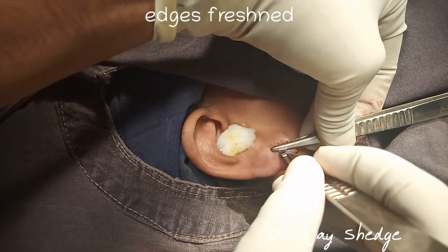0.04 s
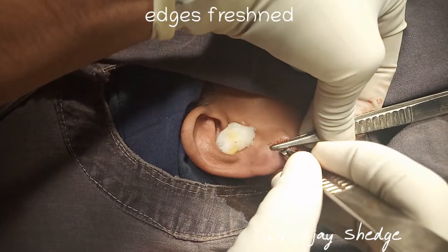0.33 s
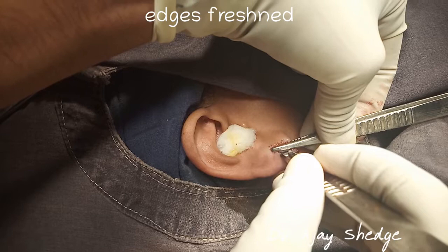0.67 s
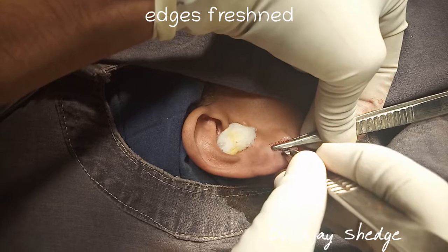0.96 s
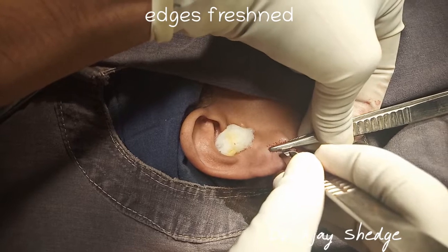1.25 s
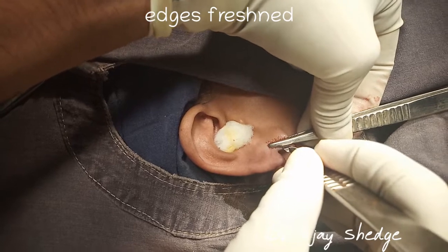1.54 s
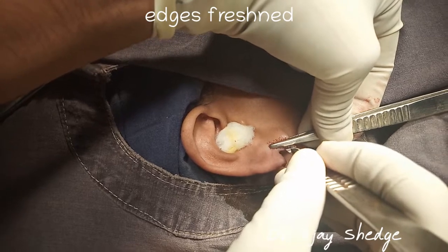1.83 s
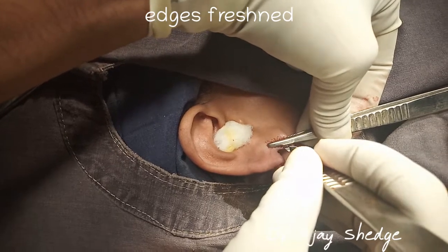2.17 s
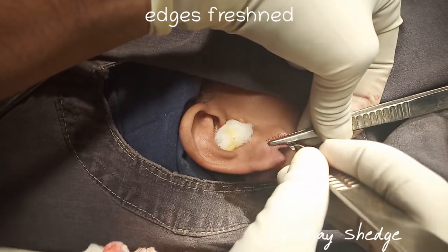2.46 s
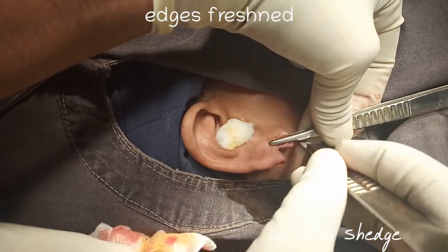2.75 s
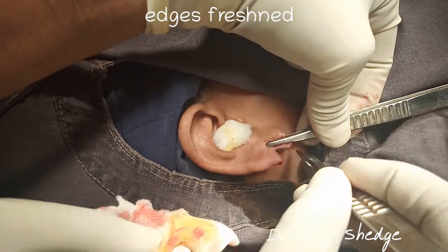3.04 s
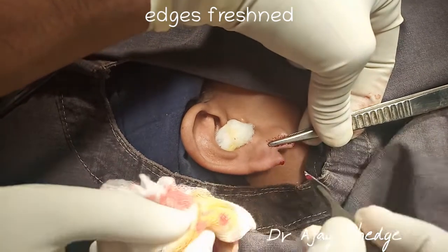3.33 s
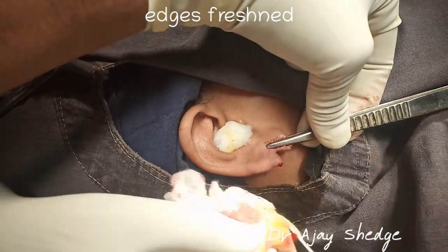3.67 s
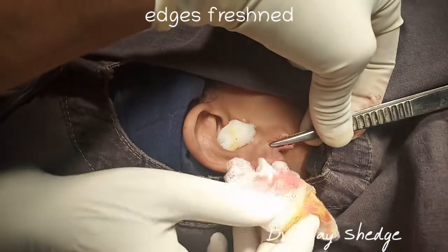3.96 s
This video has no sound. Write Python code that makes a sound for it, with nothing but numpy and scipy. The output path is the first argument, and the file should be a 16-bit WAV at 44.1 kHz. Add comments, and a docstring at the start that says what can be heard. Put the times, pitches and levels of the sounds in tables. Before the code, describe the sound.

Steel surgical instruments snip and clink close by in a small, quiet room, where a low machine hum throbs throughout over air noise and a faint whirr. Sliding steel squeaks faintly at first. From about 2.1 to 3 seconds come dry snips, taps, bright clinks and tiny squeaks, with glove and gauze rustle. A softer rustle lingers, and near 3.9 seconds another instrument clinks amid light taps.

```python
"""Steel instruments are worked close by in a small, quiet treatment room. From the start a machine, probably a
compressor, hums and throbs over air noise and a faint whirr; the ring of an earlier clink fades out and sliding
steel squeaks faintly. From 2.1 to 3 s come dry snips and taps, steel clinks and squeaks, and glove and gauze
rustle. A softer rustle lingers; near 3.9 s a second, loosely held instrument clinks amid a few light taps."""
import sys
import numpy as np
from scipy import signal
from scipy.fft import rfft, irfft, next_fast_len
from scipy.io import wavfile
from scipy.ndimage import uniform_filter1d

SR = 44100
rng = np.random.default_rng(int(sys.argv[2]) if len(sys.argv) > 2 else 0)


def unload_wav(signal):
    """Save mono or channel-first audio to the path in sys.argv[1] as 16-bit WAV at rate SR, clipped to [-1, 1]."""
    wavfile.write(
        sys.argv[1],
        SR,
        np.round(np.clip(np.atleast_2d(signal).T, -1, 1) * 32767).astype(np.int16),
    )


N = 176400

# modes of the working instrument: pitch_hz, gain_db, t60_s
STEEL_MODES = [(3400, -23, .06), (3580, -16, .03), (6090, -8, .025), (6350, -7, .025), (6630, -1, .035),
               (6900, -9, .02), (7370, -15, .04), (7600, -15, .03), (9750, 1, .028), (9800, -22, .27),
               (10080, -4, .025), (10400, -10, .03), (10610, -10, .03), (12600, -18, .02),
               (13250, -11, .025), (13550, -11, .025), (14680, -17, .025), (15000, -18, .02)]


def snips_and_taps():
    """Each snip or light tap of steel is a short crack over a duller thud."""
    # start_s, level_db, decay_s, crack_hz, crack_width_oct, thud_gain_db, thud_hz, thud_width_oct
    contacts = [(2.2101, -34, 0.00092, 8600, 1.25, -27, 1060, 0.31),
                (2.2173, -51.5, 0.0013, 7000, 3, -8, 1030, .28),
                (2.2470, -42.5, 0.0016, 5160, 0.74, -16, 1000, 0.26),
                (2.2675, -51, 0.0018, 4100, 1.5, -13, 1120, 0.16),
                (2.286, -45, 0.0026, 5200, 0.86, -19, 1040, 0.58),
                (2.3784, -32, 0.00126, 4350, 1.14, -10, 790, 0.076),
                (2.451, -69, 0.012, 3930, 1.1, 15, 773, 0.053),
                (2.5386, -45, 0.003, 7300, 0.53, -19, 780, 0.2),
                (2.598, -47, 0.0022, 7400, 0.76, -24, 900, 0.6),
                (2.7220, -71, 0.0008, 8800, 0.66, -13, 890, .28),
                (2.9315, -41.5, 0.002, 6200, 0.85, -2.5, 790, 0.17),
                (2.9334, -43.5, 0.0012, 6180, 0.88, -3, 1090, 0.076),
                (3.8704, -53, 0.0019, 10000, 0.32, -41, 900, 0.33),
                (3.9105, -57, 0.002, 7000, .7, -20, 1010, 0.25),
                (3.9098, -62, 0.013, 2790, 1, -11, 990, 0.21)]
    # broad resonances of the closed blades: freq_hz, gain_db
    blade_response = [(1000, -8), (1450, 1), (1900, 8.5), (2300, 3.5), (2600, 4), (3000, 6), (3350, -8.5),
                      (3900, 6), (5200, -0.5), (6000, 9), (7200, -3.5), (9300, -3), (11000, -1),
                      (12500, -2.5), (14500, -4), (16000, -9.5)]
    attack_s, thud_decay_s = .0008, .004
    out, t = np.zeros(N), np.arange(SR // 10) / SR
    rise = 1 - np.exp(-t / attack_s)
    for start_s, level_db, decay_s, crack_hz, crack_oct, thud_db, thud_hz, thud_oct in contacts:
        crack = colour(hiss(crack_hz, crack_oct, len(t)), blade_response) * np.exp(-t / decay_s)
        thud = hiss(thud_hz, thud_oct, len(t)) * np.exp(-t / thud_decay_s)
        contact = level(crack * rise, 0) + level(thud * rise, thud_db)
        add(out, start_s, undb(level_db) * contact * np.sqrt(decay_s / 2 / t[-1]))
    return out


def clinks(hits, modes):
    """Steel meets steel; its modes ring, roughened by chatter and quickly damped by the grip."""
    attack_s, grip_s, free_share, chatter_depth = .0009, .003, .27, .55
    out, t = np.zeros(N), np.arange(SR // 4) / SR
    envelope = (free_share + (1 - free_share) * np.exp(-t / grip_s)) * (1 - np.exp(-t / attack_s))
    mode_hz, mode_db, _ = np.array(modes).T[:, :, None]
    for start_s, level_db, tilt_db_per_oct in hits:
        tilt = undb(tilt_db_per_oct * np.log2(mode_hz / mode_hz.mean()))
        chatter = 1.5 + chatter_depth * flutter((len(mode_hz), len(t)), span_samples=80)
        ringing = (tilt * chatter * ring(modes, t)).sum(axis=0)
        modes_rms = np.sqrt(np.sum((tilt * undb(mode_db)) ** 2) / 2)
        add(out, start_s, undb(level_db) * envelope * ringing / modes_rms)
    return out


def ring(modes, t):
    """One fading sine per steel mode, slightly detuned by each new grip."""
    hz, db, t60_s = np.array(modes).T[:, :, None]
    hz = hz * (1 + .002 * rng.standard_normal(hz.shape))
    return undb(db) * np.sin(2 * np.pi * (hz * t + rng.random(hz.shape))) * fade(t, t60_s)


def instrument_clinks():
    """The working instrument is struck repeatedly, a loosely held one once."""
    # both: start_s, level_db, tilt_db_per_oct
    working_hits = [(2.2102, -46.5, -17), (2.2475, -54, -25), (2.5275, -58, 3), (2.5310, -54, -8),
                    (2.5392, -39.5, -5), (2.5415, -33, 3), (2.5995, -62, -11), (2.8275, -62, -1),
                    (2.9320, -49.5, -9)]
    loose_hits = [(3.8702, -42, 1.5)]
    # modes of the loose instrument: pitch_hz, gain_db, t60_s
    loose_modes = [(3784, -8, .11), (5330, -13, .015), (5529, -8, .06), (6643, -1, .05), (6761, -5, .045),
                   (9765, -14, .18), (10140, 1, .014), (12890, -19, .05), (14790, -17, .028)]
    return clinks(working_hits, STEEL_MODES) + clinks(loose_hits, loose_modes)


def squeaks():
    """Sliding steel catches and slips at random; the uneven contacts scratch and ring its modes."""
    # start_s, length_s, level_db, centre_hz, width_oct; the first row is the fading ring of a clink struck just
    # before the start
    slides = [(-.05, 0.12, -78, 7960, 0.11), (0.194, 0.083, -78.5, 9950, 0.067),
              (0.31, 0.025, -91.5, 9900, .03), (0.37, .05, -89.5, 9800, 0.035),
              (2.109, 0.079, -80, 8600, 0.95), (2.488, 0.055, -74, 10300, .06),
              (2.505, 0.035, -74.5, 6300, .2), (2.552, .06, -78.5, 9750, 0.6),
              (2.781, 0.066, -81.5, 10150, 0.027), (2.784, 0.034, -83, 6600, 0.095),
              (2.814, 0.03, -70, 6540, .1)]
    slips_per_s, spread_db, scratch_db = 700, 5, -7
    out, t = np.zeros(N), np.arange(SR // 4) / SR
    for start_s, length_s, level_db, centre_hz, width_oct in slides:
        swell = np.hanning(int(length_s * SR))[:len(t)] ** .5
        slips = (rng.random(len(t)) < slips_per_s / SR) * rng.choice([-1, 1], len(t))
        contacts = slips * undb(spread_db * rng.standard_normal(len(t)))
        ringing = signal.fftconvolve(contacts, ring(STEEL_MODES, t).sum(axis=0))[:len(t)]
        scrape = level(ringing, 0) + level(contacts, scratch_db)
        squeak = shape(scrape, lambda f: bell(f, centre_hz, width_oct) * rolloff(f))
        add(out, start_s, swell * level(squeak[:len(swell)], level_db))
    return out


def rustles():
    """Glove and gauze rub in swells of grainy noise."""
    # start_s, length_s, level_db, centre_hz
    rubs = [(2.11, 0.12, -77, 6400), (2.202, 0.1, -71, 5830), (2.581, 0.078, -77.5, 5700),
            (2.62, 0.41, -89, 5000), (3.095, 1, -90.5, 4544)]
    width_oct, grain_db = 1, 3
    out, size = np.zeros(N), 2 * SR
    for start_s, length_s, level_db, centre_hz in rubs:
        swell = np.hanning(int(length_s * SR))[:size]
        grain = undb(grain_db * flutter(size, span_samples=128))
        rustle = shape(grain * hiss(centre_hz, width_oct, size), rolloff)
        add(out, start_s, swell * level(rustle, level_db)[:len(swell)])
    return out


def machine():
    """Strokes swell with a slower beat and shake the housing, one booming panel and loose parts."""
    # freq_hz, gain_db
    housing_response = [(25, -29), (39, -9.5), (60, -32.5), (85, -10.5), (105, -15.5), (130, -16),
                        (155, 3.5), (195, -2.5), (220, -18.5), (270, -27.5), (315, -22.5), (420, -28.5),
                        (520, -48), (680, -33.5), (800, -64.5), (1500, -89.5)]
    # buzzing resonances: pitch_hz, width_hz, gain_db
    loose_parts = [(227, 4.5, 0.5), (309.9, 7.3, 10), (358.7, 21, 2), (426.3, 21, 4), (584, 8.7, -11.5),
                   (674.3, 8, 3), (697.4, 23, -6), (854, 7.7, -23.5)]
    stroke_hz, throb_hz, throb_peak_s = 49.7, 10.93, .2005
    sharpness, force_floor, spread_db = 2.8, .12, .5
    panel_hz, panel_width_hz, panel_db = 177, 2.5, 10
    t = np.arange(N) / SR - throb_peak_s
    stroke_s = np.arange(np.ceil(t[0] * stroke_hz), t[-1] * stroke_hz) / stroke_hz
    force = force_floor + np.exp(sharpness * (np.cos(2 * np.pi * throb_hz * stroke_s) - 1))
    unevenness = undb(spread_db * rng.standard_normal(len(stroke_s)))
    strokes = np.zeros(N)
    strokes[((stroke_s - t[0]) * SR).astype(int)] = force * unevenness
    housing = colour(strokes, housing_response)
    hum = shape(housing, lambda f: 1 + (undb(panel_db) - 1) / (1 + ((f - panel_hz) / panel_width_hz) ** 2))
    shaft = np.sin(2 * np.pi * stroke_hz * t)
    buzz = rng.standard_normal(N) * (1 + shaft) ** 2 * np.sqrt(np.interp(t, stroke_s, force))
    rattle = shape(buzz, lambda f: sum(undb(db) / (1 + 2 * ((f - hz) / width_hz) ** 2)
                                       for hz, width_hz, db in loose_parts))
    return level(hum, db=-48) + level(shaft, db=-54) + level(rattle, db=-61.5)


def whirr():
    """A faint, narrow band of noise above the hum swells and fades."""
    # time_s, level_db
    swells = [(0, -82.5), (.45, -91), (.75, -81.5), (.92, -83), (1.07, -78), (1.149, -95), (1.451, -95),
              (1.579, -81), (1.7, -94), (2.15, -92.5), (2.35, -70.5), (2.62, -91.5), (2.83, -73.5),
              (3.2, -93), (3.419, -73), (3.578, -96.5), (3.75, -92), (4, -84.5)]
    time_s, level_db = np.array(swells).T
    envelope = undb(np.interp(np.arange(N) / SR, time_s, level_db))
    return hiss(centre_hz=844, width_oct=.12, size=N) * envelope


def air():
    """Steady, mostly low air noise of the room."""
    # freq_hz, gain_db
    spectrum = [(22, -40.5), (45, -21), (66, -3.5), (95, -5), (125, -0.5), (175, 9), (240, -6),
                (420, -13.5), (520, -33), (700, -21), (860, -40), (960, -42.5), (1090, -40), (1350, -45.5),
                (2000, -46), (4000, -53.5), (8000, -59), (16000, -60.5)]
    return level(colour(rng.standard_normal(N), spectrum), db=-49)


def room(x):
    """Adds a bright scatter from nearby things and a soft tail from the walls."""
    # freq_hz, gain_db
    wall_response = [(300, -37.5), (900, 13), (1500, 17), (2200, 15), (5000, 2), (10000, -8),
                     (16000, -35.5)]
    gap_s = .0018
    t = np.arange(SR // 2) / SR
    tail = colour(rng.standard_normal(len(t)), wall_response) * fade(t, t60_s=.12)
    scatter = rng.standard_normal(len(t)) * fade(t, t60_s=.11)
    response = (level(tail, db=-15) + level(scatter, db=-17.5)) * (t > gap_s) / np.sqrt(len(t))
    return x + signal.fftconvolve(x, response)[:N]


def undb(db):
    """Decibels to gain."""
    return 10 ** (np.asarray(db) / 20)


def level(x, db):
    """Scale to an rms level."""
    return x * undb(db) / np.sqrt(np.mean(x ** 2) + 1e-30)


def fade(t, t60_s):
    """Exponential decay, 60 dB down at t60_s."""
    return np.exp(-np.log(1000) * t / t60_s)


def shape(x, gain):
    """Filter by a gain given as a function of frequency."""
    size = next_fast_len(2 * len(x))
    freq_hz = np.maximum(np.arange(size // 2 + 1) * SR / size, 1)
    return irfft(rfft(x, size) * gain(freq_hz), size)[:len(x)]


def colour(x, points):
    """Filter by freq_hz, gain_db points."""
    hz, db = np.array(points).T
    return shape(x, lambda f: undb(np.interp(np.log(f), np.log(hz), db)))


def bell(f, centre_hz, width_oct):
    """Gain of a bell-shaped band."""
    return (1 + (np.log2(f / centre_hz) / width_oct) ** 2 / 2) ** -2


def rolloff(f, top_hz=11300):
    """Low-pass gain for the friction sounds."""
    return 1 / (1 + (f / top_hz) ** 20)


def hiss(centre_hz, width_oct, size):
    """Noise of rms 1 in a bell-shaped band."""
    return level(shape(rng.standard_normal(size), lambda f: bell(f, centre_hz, width_oct)), 0)


def flutter(size, span_samples):
    """Smoothed noise of rms 1."""
    return level(uniform_filter1d(rng.standard_normal(size), span_samples), 0)


def add(out, start_s, x):
    """Mix x into out at start_s."""
    i = int(round(start_s * SR))
    x, i = x[max(-i, 0):], max(i, 0)
    out[i:i + len(x)] += x[:max(len(out) - i, 0)]


def scene():
    """Instruments in the room, over air, machine hum and whirr; mono."""
    background = air() + machine() + whirr()
    handling = snips_and_taps() + instrument_clinks() + squeaks() + rustles()
    return (background + room(handling))[None]


def record(dry):
    """A steep low-pass cuts the top treble."""
    top_hz = 16100
    return signal.sosfilt(signal.ellip(8, .2, 70, top_hz, fs=SR, output="sos"), dry)


dry = scene()
out = record(dry)
unload_wav(out)
```